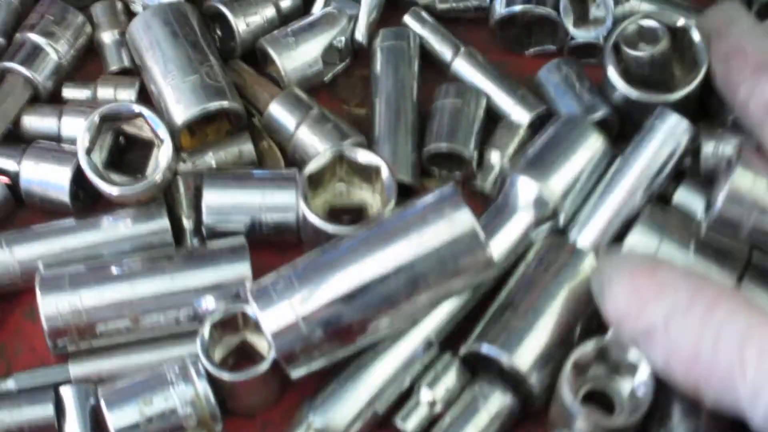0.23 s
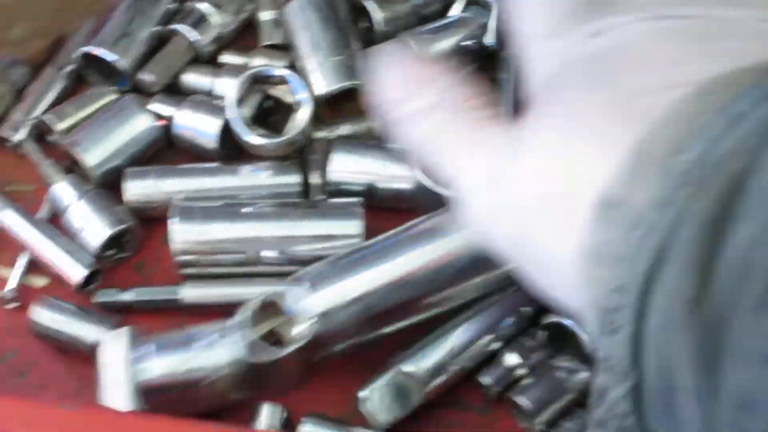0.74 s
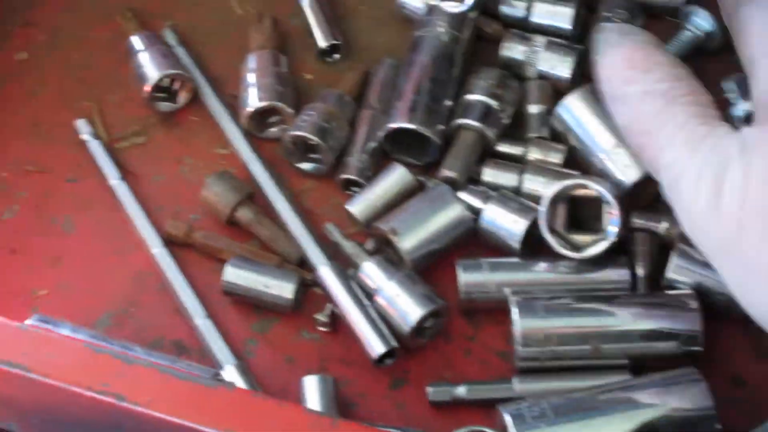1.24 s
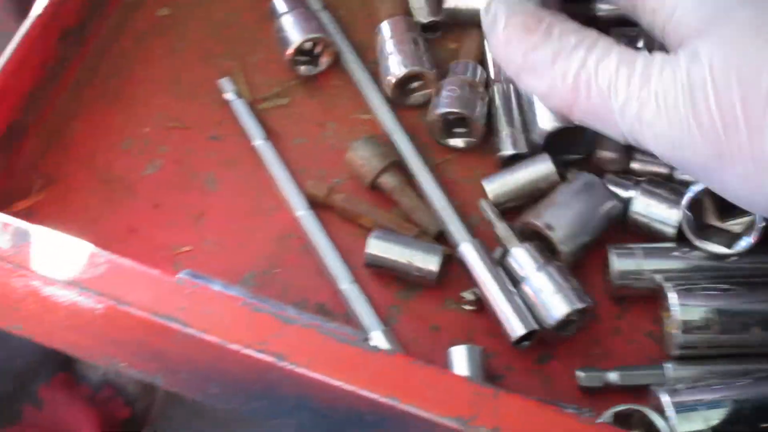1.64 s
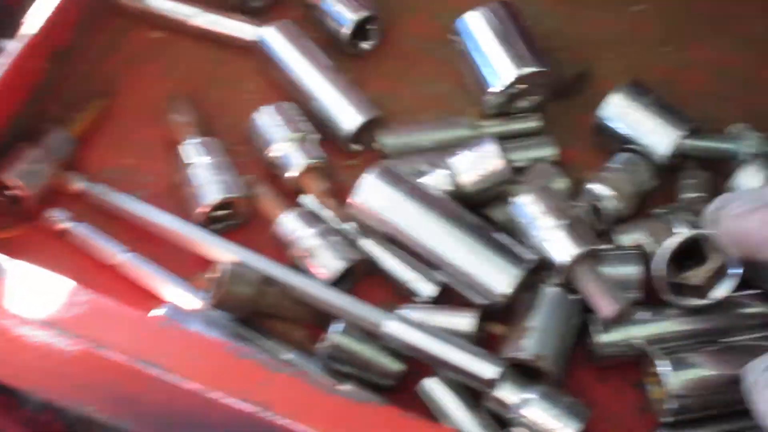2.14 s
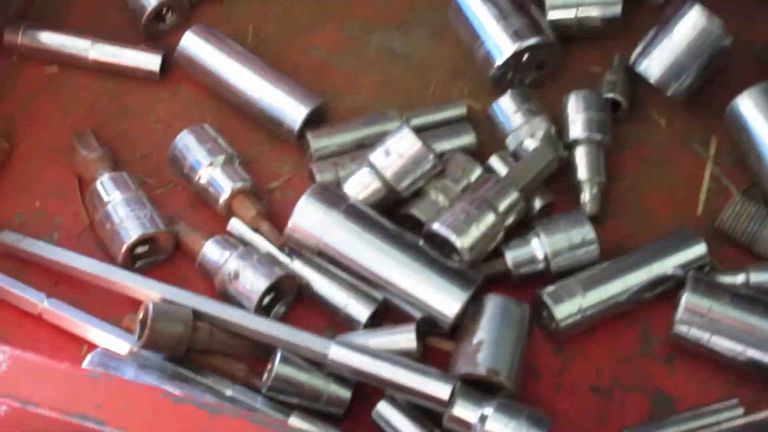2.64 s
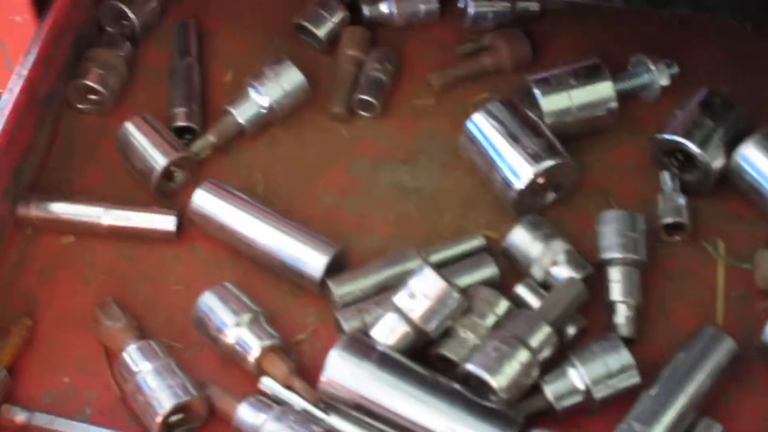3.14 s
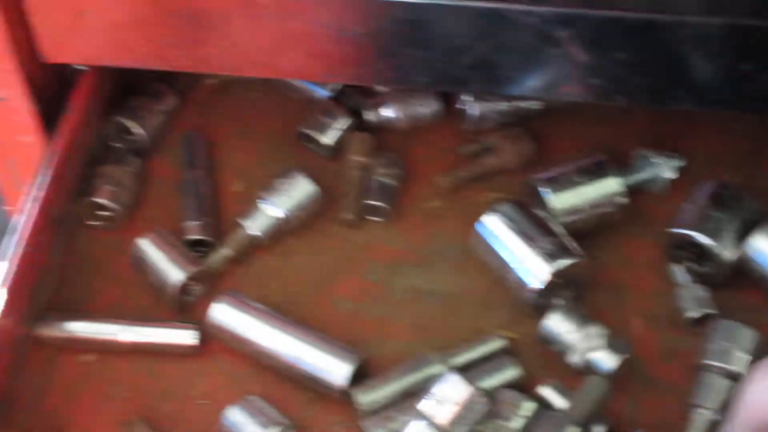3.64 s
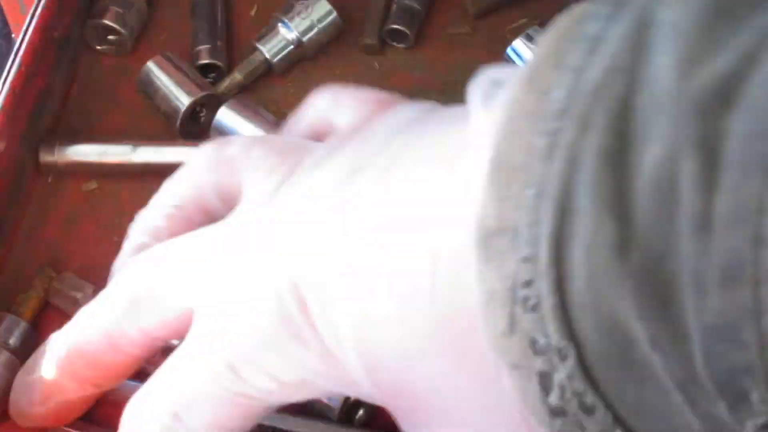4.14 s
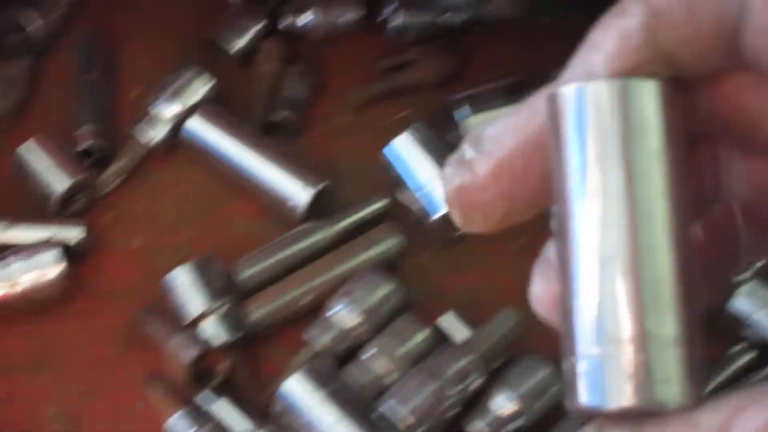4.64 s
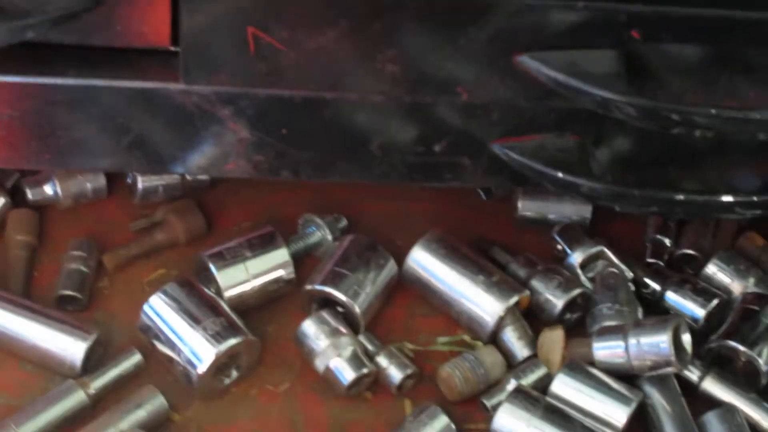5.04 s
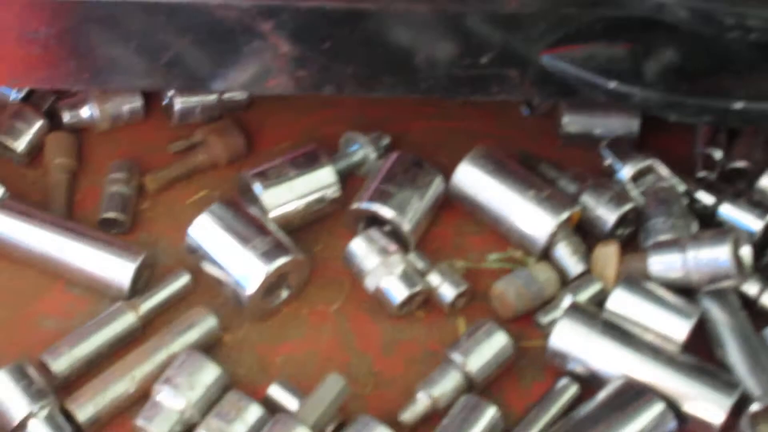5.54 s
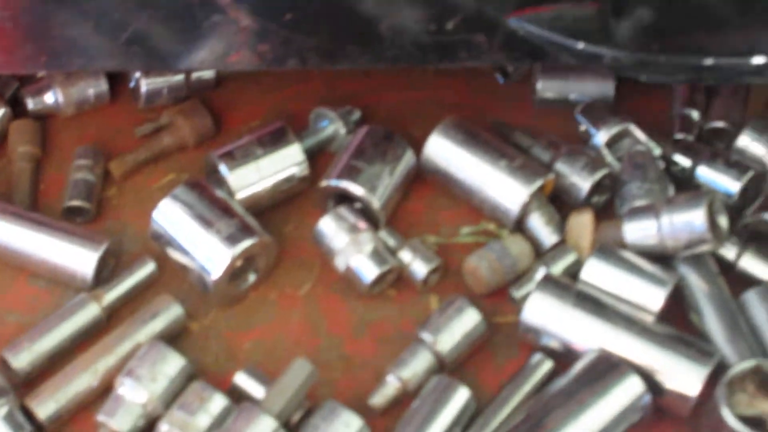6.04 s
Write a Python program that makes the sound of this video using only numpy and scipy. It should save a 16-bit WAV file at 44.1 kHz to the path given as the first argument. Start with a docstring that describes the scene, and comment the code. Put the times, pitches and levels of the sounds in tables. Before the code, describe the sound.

Steel sockets clatter in a sheet-metal tool drawer, close to the microphone. From the start until about 2.8 seconds a hand pushes through them in uneven surges: sharp clacks, dense small clinks, a rolling rumble and hollow thumps on the drawer bottom, with occasional very high, brief rings. Around 3 to 3.5 seconds the contacts turn lighter and sparser. A strong clack with a thin ring comes at 3.7 seconds, and more knocking and rattling follows from 4.1 to 4.7 seconds as one socket is picked up. After a couple of faint taps there is a lull, holding only the soft hiss of a rustling sleeve. At about 5.9 seconds the socket drops back on the heap with a loud clack and a few bounces, settling by 6.2 seconds. The workshop has a short, slight echo and a faint low hum throughout.

```python
"""Steel sockets clack together in a sheet-metal tool drawer, close to one microphone in a humming workshop.
A gloved hand rummages through them: they roll and chatter, thump the drawer bottom and now and then
ring out very high. One is lifted, held for a second while the sleeve rustles, and dropped back
on the heap. The walls give a short, quiet answer."""
import sys
import numpy as np
from scipy import signal
from scipy.fft import rfft, irfft, next_fast_len
from scipy.io import wavfile
from scipy.ndimage import map_coordinates

SR = 44100
rng = np.random.default_rng(int(sys.argv[2]) if len(sys.argv) > 2 else 0)


def pcm_store(signal):
    """Save signal as 16-bit PCM."""
    levels = np.round(np.clip(np.atleast_2d(signal), -1, 1) * 32767)
    wavfile.write(sys.argv[1], SR, levels.astype(np.int16).T)


N = 277830

# modes of the drawer bottom, damped by its load: pitch_hz, level_db, t60_s
DRAWER_MODES = [(113, -21.5, .16), (248, -15.5, 0.056), (278.3, -7.5, 0.092), (301, 1.5, 0.025),
                (394, 1, .022), (455, -0.5, 0.026), (533.3, -1.5, 0.034), (585, -5, 0.046),
                (670, -7, 0.028), (790.4, -6, 0.026), (927.5, -8.5, 0.039), (1450, -11.5, 0.015),
                (1760, -11.5, .025), (3182, -6.5, 0.0075)]


def amp(db):
    """Decibels to gain."""
    return 10 ** (np.asarray(db) / 20)


def unit(x):
    """Scaled to rms 1."""
    return x / np.sqrt(np.mean(x ** 2) + 1e-20)


def along(points, hz):
    """Read (Hz, value) points on a log frequency axis."""
    point_hz, values = np.transpose(points)
    return np.interp(np.log(hz + 1), np.log(point_hz), values)


def fade(t, t60):
    """Free decay: 60 dB down after t60 seconds."""
    return np.exp(-np.log(1000) * t / np.maximum(t60, 1e-3))


def wobble(per_s, size):
    """A smooth random curve with per_s knots a second."""
    knots = rng.standard_normal(int(size * per_s / SR) + 4)
    return map_coordinates(knots, [np.arange(size) * per_s / SR], order=2)


def filtered(x, gain):
    """Apply a gain that depends on frequency."""
    size = next_fast_len(len(x) + 2048)
    return irfft(rfft(x, size) * gain(np.fft.rfftfreq(size, 1 / SR)), size)[:len(x)]


def coloured(x, colour):
    """Shape x by (Hz, dB) points and scale it to rms 1."""
    return unit(filtered(x, lambda hz: amp(along(colour, hz))))


def add(track, start_s, sound):
    """Mix a sound into the track."""
    part = track[max(round(start_s * SR), 0):][:len(sound)]
    part += sound[:len(part)]


def room_tone(hum_hz):
    """Workshop air and a low machine hum, each drifting in level."""
    # background levels: time_s, air_db, hum_db
    levels = [(0, -59, -68), (2.3, -63.5, -82.5), (3.3, -67, -79.5), (4.5, -53, -73), (5.05, -64.5, -70),
              (5.25, -58.5, -70), (5.9, -60, -65.5), (6.3, -61, -77)]
    # spectrum of the air: frequency_hz, level_db
    air_colour = [(30, -12), (110, -5.5), (170, -6), (270, -1), (400, -2), (550, -7.5), (950, -6),
                  (1500, -8), (2300, -13), (8000, -19.5), (15000, -26.5)]
    t = np.arange(N) / SR
    time_s, air_db, hum_db = np.transpose(levels)
    air = coloured(rng.standard_normal(N), air_colour)
    hum = unit(np.sin(2 * np.pi * hum_hz * t))
    return amp(np.interp(t, time_s, air_db)) * air + amp(np.interp(t, time_s, hum_db)) * hum


def clack(t, edge_db, t60, ping_db=-3, ping_t60=0.031, pings=8):
    """Steel on steel: the heap chokes the dense modes within milliseconds; a few stand out as pings."""
    # spectrum of a contact: frequency_hz, level_db
    colour = [(350, -44.5), (600, -38.5), (633, -18), (911, -9), (1110, -8.5), (1790, -6), (2220, -5),
              (4460, -6.5), (7350, -11.5), (8410, -15), (9620, -15), (10700, -18), (11900, -21),
              (15000, -27)]
    ping_hz = rng.uniform(1479, 13500, (pings, 1))
    ping = np.sum(np.sin(2 * np.pi * ping_hz * t), axis=0) / np.sqrt(pings)
    burst = rng.standard_normal(len(t)) * fade(t, t60) + amp(ping_db) * ping * fade(t, ping_t60)
    # the harder the contact, the faster it builds and the more treble it holds
    attack = 1 - fade(t, 0.004 * amp(-(edge_db + 8) / 2))
    treble = [(1800, 0), (8500, edge_db + 13)]
    return filtered(burst * attack, lambda hz: amp(along(colour, hz) + along(treble, hz)))


def thud(t, tilt_db, scatter_db=5, detune=0.019, rise_s=0.0012, bass_db=-20.5):
    """The drawer bottom flexes; the spot and its load favour the low or the hollow upper modes."""
    hz, db, t60 = np.transpose(DRAWER_MODES)[:, :, None]
    level_draw, pitch_draw = rng.standard_normal((2,) + hz.shape)
    tilt_share = along([(270, -1), (850, 0.7), (1800, 0)], hz)
    polarity = (-1) ** np.arange(len(hz))[:, None]
    strength = polarity * amp(db + tilt_db * tilt_share + scatter_db * level_draw)
    modes = strength * np.sin(2 * np.pi * hz * (1 + detune * pitch_draw) * t) * fade(t, t60)
    flex = np.sum(modes, axis=0) * (1 - fade(t, rise_s))
    # a small open sheet radiates little bass
    sound = signal.lfilter(*signal.butter(4, 245, "highpass", fs=SR), flex) + amp(bass_db) * flex
    return sound / np.sqrt(np.mean(sound[:SR // 100] ** 2))  # rms 1 over the first 10 ms


def knocks(blows):
    """Sockets strike each other and the drawer: a clack and a thud for each blow."""
    out, t = np.zeros(N), np.arange(SR // 9) / SR
    for start_s, db, thud_db, tilt_db, edge_db in blows:
        t60 = 0.046 * amp(0.071 * db)  # a light tap stirs fewer neighbours, so it is over sooner
        steel = amp(2.5) * clack(t, edge_db, t60)
        drawer = amp(thud_db - 8.5) * thud(t, tilt_db)
        add(out, start_s, amp(db) * (steel + drawer))
    return out


def hand_pushes(roll_range_db=30.5, chatter_range_db=37):
    """Rolling and chatter levels in dB: each push swells, holds and settles; the strongest leads."""
    # pushes through the heap: peak_s, rise_s, hold_s, settle_s, roll_db, chatter_offset_db
    pushes = [(0.144, 0.18, 0.013, 0.31, -27.5, 5), (0.816, 0.18, 0.16, 0.38, -35, 3),
              (1.56, 0.28, 0.24, 0.14, -37, 2), (1.712, 0.27, 0.094, 0.47, -29.5, 2),
              (2.45, 0.13, 0.046, 0.36, -35.5, 5.5), (3.051, 0.12, 0.0061, 0.16, -41, 8),
              (3.459, 0.21, 0.017, 0.094, -63, -3.5), (3.747, 0.15, 0.0189, 0.18, -35, 6.5),
              (4.151, 0.035, 0.0085, 0.25, -47, 3), (4.4, 0.13, 0.017, 0.08, -33.5, 1.5),
              (4.54, 0.17, 0.011, 0.17, -34, -4.5)]
    t, roll_db, chatter_db = np.arange(N) / SR, [], []
    for peak_s, rise_s, hold_s, settle_s, db, offset_db in pushes:
        slack = np.maximum(peak_s - t, 0) / rise_s + np.maximum(t - peak_s - hold_s, 0) / settle_s
        roll_db.append(db - roll_range_db * slack)
        chatter_db.append(db + offset_db - chatter_range_db * slack)  # starts later, stops sooner
    return np.max(roll_db, axis=0), np.max(chatter_db, axis=0)


def rolling(per_s, spread_db, wander_db):
    """Sockets bump along the drawer bottom; its modes come and go as they cross it. Rms 1."""
    # tone shaping of the rumble: frequency_hz, gain_db
    colour = [(30, -29), (110, -14.5), (200, -10), (275, -2.5), (330, -8.5), (450, -5), (560, -1), (680, 3),
              (900, 2.5), (1200, 10), (1750, 5.5), (2600, 1), (5000, -20)]
    out, t = np.zeros(N), np.arange(SR // 8) / SR
    bumps = (rng.random(N) < per_s / SR) * amp(spread_db * rng.standard_normal(N))
    bumps *= rng.choice([-1, 1], N)
    for k, (hz, db, t60) in enumerate(DRAWER_MODES):
        mode = (-1) ** k * amp(db) * np.sin(2 * np.pi * hz * t) * fade(t, t60)
        wander = np.repeat(wobble(700, N // 100 + 1), 100)[:N]  # stretched to 7 knots a second
        out += signal.oaconvolve(bumps, mode)[:N] * amp(wander_db * wander)
    return coloured(out, colour)


def chatter(per_s, spread_db, t60, rise_s, sockets):
    """Dense little clinks between neighbours, each socket with its own briefly ringing modes. Rms 1."""
    # spectrum of the clinks: frequency_hz, level_db
    colour = [(100, -38), (600, -16), (1500, 2), (2400, 3.5), (4000, 1.5), (6000, -5), (9500, -7),
              (12300, -16.5), (15000, -72.5)]
    out, t = np.zeros(N), np.arange(SR // 16) / SR
    mode_hz = rng.uniform(1000, 14000, (sockets, 26, 1))
    modes = np.sin(2 * np.pi * (mode_hz * t + rng.random(mode_hz.shape)))
    clinks = np.sum(modes, axis=1) * fade(t, t60) * (1 - fade(t, rise_s))
    for i in np.flatnonzero(rng.random(N) < per_s / SR):
        add(out, i / SR, amp(spread_db * rng.standard_normal()) * clinks[rng.integers(sockets)])
    return coloured(out, colour)


def rim_ticks(roll_db, max_per_s=54, full_rate_db=-35, spread_db=7):
    """Rims snap past each other, more often under a harder push: a click that leaves two brief rings."""
    # spectrum of the click: frequency_hz, level_db
    colour = [(500, -34), (2000, 5.5), (4500, -1), (9000, -4.5), (12500, -11.5), (15000, -24.5)]
    out, t = np.zeros(N), np.arange(SR // 20) / SR
    per_s = max_per_s * np.minimum(amp(roll_db - full_rate_db), 1)
    for i in np.flatnonzero(rng.random(N) < per_s / SR):
        ring_hz = rng.uniform([[1500], [11000]], [[7500], [12700]])
        ring = np.sum(np.sin(2 * np.pi * ring_hz * t), axis=0) * fade(t, t60=0.014)
        click = coloured(rng.standard_normal(len(t)), colour) * fade(t, t60=0.017)
        db = roll_db[i] + 6 - spread_db * rng.standard_normal()
        add(out, i / SR, amp(db) * (click + amp(-7.5) * ring))
    return out


def stray_blows(roll_db, per_s=3.3, lift_db=12, thud_db=-26.5, tilt_db=7.5, edge_db=-5.5, spread_db=1.5):
    """Light blows at random moments, their strength following the push that sets them off."""
    starts = np.flatnonzero(rng.random(N) < per_s / SR)
    scatter_db = spread_db * rng.standard_normal((N, 3))[starts]
    return [(i / SR, roll_db[i] + lift_db + louder, thud_db + deeper, tilt_db, edge_db + harder)
            for i, (louder, deeper, harder) in zip(starts, scatter_db)]


def rocking_blows():
    """A socket rocks from end to end: evenly spaced blows that change level in equal steps."""
    # rocking sockets: start_s, first_db, thud_db, tilt_db, edge_db, gap_s, step_db, contacts
    rattles = [(0.138, -1.5, -15.5, -3, -13, 0.022, -0.5, 2), (0.596, -4, -8.5, -2, -12.5, .0105, 1.5, 2),
               (0.831, -9, -13, -4.5, -16.5, 0.012, 6.5, 3), (1.363, -22.5, -12, 15, -32, 0.022, 1, 2),
               (2.701, -0.5, -9, -5, -11, .011, -4.5, 2), (3.414, -20.5, -33, -1, -31, 0.013, 0, 2),
               (3.025, -16, -16, 8.5, -2, 0.017, -0.5, 3), (4.35, -22.5, -6.5, 6, -15, 0.016, 5.5, 2),
               (4.415, -3.5, -15, 5.5, -23.5, 0.013, 0, 2),
               (4.523, 1.5, -12.5, -4.5, -22.5, 0.023, -5.5, 2),
               (4.585, -11, -8.5, 10.5, -11, 0.022, -17, 3), (5.96, -11.5, -14, 8, -23, 0.023, 1, 3),
               (6.052, 2, -9.5, -4, -13, 0.011, -7, 2)]
    return [(start_s + k * gap_s, db + k * step_db, thud_db, tilt_db, edge_db)
            for start_s, db, thud_db, tilt_db, edge_db, gap_s, step_db, contacts in rattles
            for k in range(round(contacts))]


def socket_rings(blur_rad=4.6, flutter_db=2, rise_s=0.0016):
    """Loose sockets ring like tiny bells; rattling on neighbours blurs the pitch and roughens the level. A
    faint, narrow 5 kHz tone at 5.1 s is made the same way."""
    # sockets left free to ring, and one faint narrow tone at 5.1 s: start_s, pitch_hz, level_db, t60_s
    rings = [(0.152, 14360, -28, .24), (0.16, 1900, -11, 0.03), (0.165, 13100, -27, .07),
             (0.214, 874, -16, 0.039), (0.369, 12400, -19, 0.023), (0.369, 5000, -34, 0.1),
             (0.372, 14450, -40, 0.1), (0.855, 14460, -40, .25), (1.111, 12080, -22, 0.047),
             (1.177, 12100, -20.5, .025), (1.45, 11760, -14.5, 0.073), (1.674, 12370, -21, 0.024),
             (1.729, 12200, -18.5, 0.079), (1.807, 12400, -26, .06), (1.98, 12000, -27.5, 0.14),
             (1.98, 9640, -32, .12), (1.979, 7230, -24, 0.11), (2.017, 1600, -9, 0.04),
             (2.444, 11960, -24, 0.028), (2.459, 11800, -26.5, 0.15), (2.489, 12960, -14, 0.034),
             (2.597, 1733, -17.5, 0.044), (2.716, 14400, -39, 0.13), (2.712, 12520, -43.5, 0.35),
             (3.13, 9420, -31, 0.071), (3.174, 9460, -23, 0.049), (3.227, 9600, -24, 0.014),
             (3.728, 14645, -37, 0.31), (3.727, 12660, -36, 0.32), (3.755, 4980, -20, 0.18),
             (3.762, 9900, -22.5, 0.039), (3.785, 4970, -23, 0.085), (3.846, 9500, -30.5, 0.049),
             (4.129, 7470, -31.5, 0.047), (4.394, 12300, -33.5, 0.06), (4.415, 11200, -35, 0.073),
             (4.54, 12300, -38, 0.16), (4.588, 12290, -43, 0.092), (5.112, 5140, -51, .09),
             (5.94, 3060, -4.5, 0.02)]
    out = np.zeros(N)
    for start_s, hz, db, t60 in rings:
        t = np.arange(int(t60 * SR)) / SR
        drift = blur_rad * np.cumsum(rng.standard_normal(len(t))) / np.sqrt(len(t))
        flutter = amp(flutter_db * wobble(per_s=330, size=len(t)))
        envelope = flutter * fade(t, t60) * (1 - fade(t, rise_s))
        add(out, start_s, amp(db - 0.5) * envelope * np.sin(2 * np.pi * hz * t + drift))
    return out


def sleeve(release_s=0.06, uneven_db=0.5):
    """Cloth and glove rub with a soft, uneven hiss; light strokes hold only treble."""
    # strokes of the cloth: start_s, length_s, rise_s, level_db, low_cut_hz
    rubs = [(4.02, 0.091, 0.01, -50, 910), (4.864, 0.07, 0.027, -55.5, 1500),
            (4.977, 0.12, 0.22, -59, 4500), (5.109, 0.024, 0.056, -54, 4430),
            (5.349, 0.028, 0.14, -58.5, 4540), (5.415, 0.024, 0.073, -53, 4560),
            (5.505, 0.098, 0.14, -60.5, 5000), (5.641, 0.022, 0.061, -60.5, 4970),
            (5.776, 0.047, 0.074, -61.5, 3480)]
    # spectrum of the rubbing: frequency_hz, level_db
    colour = [(300, -5), (1500, 16), (3500, 20.5), (5500, 21), (9500, 20), (12000, 14), (15000, 8.5)]
    out, t = np.zeros(N), np.arange(SR // 3) / SR
    for start_s, length_s, rise_s, db, low_cut_hz in rubs:
        friction = coloured(rng.standard_normal(len(t)), colour)
        hiss = unit(filtered(friction, lambda hz: 1 - 1 / (1 + (hz / low_cut_hz) ** 4)))
        stroke = (1 - fade(t, rise_s)) * fade(np.maximum(t - length_s, 0), release_s)
        add(out, start_s, amp(db - uneven_db * wobble(per_s=112, size=len(t))) * stroke * hiss)
    return out


def workshop_reverb(near, build_up_s, wet_db):
    """The walls return a short, diffuse tail in which the bass lasts longest."""
    # decay of the room: frequency_hz, t60_s
    walls = [(150, 0.26), (500, 0.15), (2000, 0.18), (6000, 0.16), (14000, 0.18)]
    hz, t, spectrum = signal.stft(rng.standard_normal(SR), SR, nperseg=256)
    envelope = fade(t, along(walls, hz)[:, None]) * (1 - fade(t, build_up_s))
    _, tail = signal.istft(spectrum * envelope, SR, nperseg=256)
    return amp(wet_db) * signal.fftconvolve(near, tail / np.linalg.norm(tail))[:N]


def scene():
    """The drawer close up, with the workshop behind it, in mono."""
    # single blows of a socket: start_s, level_db, thud_db, tilt_db, edge_db
    # (tilt favours the drawer's upper modes, edge brightens the steel)
    single_blows = [(0.009, -20, -22, 2, -26), (0.049, -7, -11, 10.5, -22.5), (0.071, -8, -30.5, -2, -20.5),
                    (0.126, -3, -24, 1.0, -19), (0.188, 0.5, -8, 6, -22), (0.207, -1.5, -14.5, 5, -19),
                    (0.235, 5, -12, 0.5, -22.5), (0.294, -10.5, -5.5, 12, -35),
                    (0.326, -22.5, -3.5, 3, -31), (0.341, -13.5, -29, 9, -23), (0.366, -9, -22, 8.0, -21.5),
                    (0.416, -18.5, -17, -4, -20), (0.591, -22, -6, 3, -11), (0.636, -6.5, -12, 11, -17),
                    (0.7, 1.5, -20.5, -5.5, -17), (0.722, -9.5, -15.5, 1.0, -12),
                    (0.769, -6, -13, 4.5, -16.5), (0.797, -24, -23.5, 8, 0), (0.947, -9.5, -11.5, 3, -15),
                    (1.001, -1, -17, 2.0, -24.5), (1.073, 2, -10.5, -1.5, -24),
                    (1.177, -9.5, -17.5, 16, -31), (1.205, -6.5, -19, -5, -28.5),
                    (1.258, -17, -13.5, -2.0, -22.5), (1.283, -4.5, -3, 2, -25),
                    (1.439, -16.5, -13.5, 8.0, -21), (1.449, -12.5, -16, 0.5, -11.5),
                    (1.46, -13, -28, -12, -11), (1.469, -2, -17.5, -1, -13), (1.542, -14, -31, 8.0, -10.5),
                    (1.56, -15, -20, 17, -17), (1.682, -17, -14, 13, -5), (1.71, -10, -5, 12, -3.5),
                    (1.851, -7.5, -14.5, 2.5, -15.5), (1.861, -3, -16, 3, -20), (1.91, -9, -19, 1.5, -21),
                    (1.931, -11.5, -34, -10, -10), (1.949, -10, -17, 2.5, -16), (1.962, -5, -17, 11, -16),
                    (2.017, 1.5, -14.5, -5, -18.5), (2.082, -10, -14, 6.0, -23.5),
                    (2.163, -12, -16, 14, -18.5), (2.196, -14, -15, 0.5, -24), (2.385, -5, -19, -1.5, -31),
                    (2.403, -22.5, -18.5, 8, -3), (2.459, -15, -0.5, -2, -0.5),
                    (2.493, -2, -12, 4.5, -13.5), (2.566, -17.5, -4.5, -4, -2.5), (2.584, -24.5, -9, 20, 9),
                    (2.598, -4.5, -14, 1, -23), (2.677, -19, -17, -7, -35), (2.748, 0, -11, 3.5, -22.5),
                    (2.949, -24.5, -21, -2, -17.5), (2.987, -19, -40.5, 0.0, -18.5),
                    (3.099, -24.5, -11, -2, -22), (3.228, -24.5, -37, 0.0, -21.5),
                    (3.363, -33, -28, -11, -22.5), (3.398, -34, -26, 3, -17), (3.462, -27, -24, -1, -24),
                    (3.475, -13, -20.5, -1, -28.5), (3.624, -11, -37, 2.0, -25),
                    (3.636, -16, -47, 3.0, -31), (3.648, -12.5, -15.5, 6.0, -10.5),
                    (3.716, -25.5, -7, -11, -5), (3.728, 0.5, -16, -3.0, -13.5),
                    (3.783, -15.5, -5, 2.0, -7), (3.835, -16, -18, 2, -16), (4.128, -16, -35, 1.0, -16.5),
                    (4.141, -21, -30, -1.0, -21), (4.182, -11, -21, 4, -12), (4.19, -17.5, -10, 4, -25),
                    (4.262, -34, -28, 0.5, -1.5), (4.273, -18.5, -14, 5.0, -27),
                    (4.282, -14.5, -34, -4, -19.5), (4.375, -12, -18, 0, -31),
                    (4.393, -18, -19.5, 1.0, 0.5), (4.459, -16, -3, 1, -19), (4.508, -14.5, -25, 1.5, -17),
                    (4.555, -3.5, -18, 10.0, -24.5), (4.625, -10.5, -19, 21, -47),
                    (4.722, -13.5, -13.5, 21.5, -26), (4.828, -34.5, -13, 3, -21),
                    (4.959, -30.5, -30.5, 3, -32.5), (5.059, -38, -27.5, 0.5, -13),
                    (5.938, 1.5, -6, -2.5, -12), (6.08, -7.5, -14, 0.0, -12.5), (6.11, -9, -7, 1.5, -25),
                    (6.176, -17.5, -26, 11.5, -14.5), (6.18, -10.5, -8.5, 11.5, -26)]
    roll_db, chatter_db = hand_pushes()
    near = knocks(single_blows + rocking_blows()) + socket_rings()
    near += amp(roll_db + 3.5) * rolling(per_s=900, spread_db=2.5, wander_db=1.8)
    near += amp(chatter_db + 0.9) * chatter(per_s=520, spread_db=2.7, t60=0.04, rise_s=0.0015, sockets=120)
    near += sleeve() + rim_ticks(roll_db) + knocks(stray_blows(roll_db))
    return (near + workshop_reverb(near, build_up_s=0.071, wet_db=-14.5) + room_tone(hum_hz=71.3))[None]


def record(dry):
    """The microphone sheds deep bass, clips at full scale and cuts off the highest treble."""
    low_cut_hz, top_hz = 55, 15150
    lean = signal.sosfilt(signal.butter(2, low_cut_hz, "highpass", fs=SR, output="sos"), dry[0])
    return filtered(np.clip(lean, -1, 1), lambda hz: 1 / np.sqrt(1 + (hz / top_hz) ** 200))[None]


dry = scene()
out = record(dry)
pcm_store(out)
```